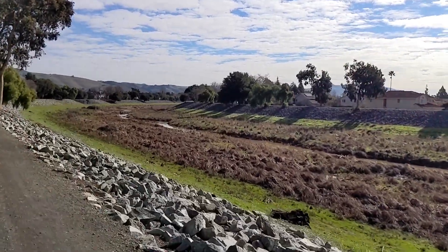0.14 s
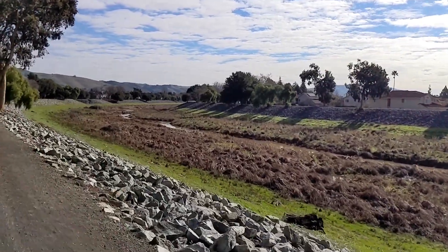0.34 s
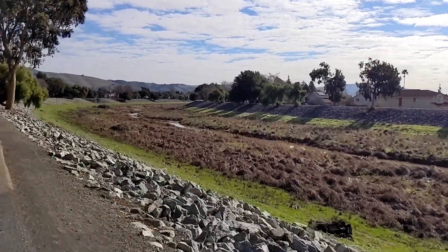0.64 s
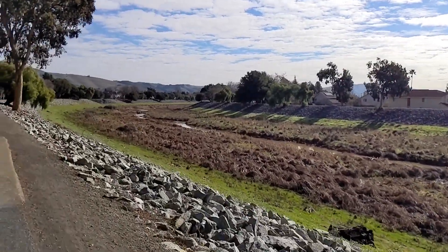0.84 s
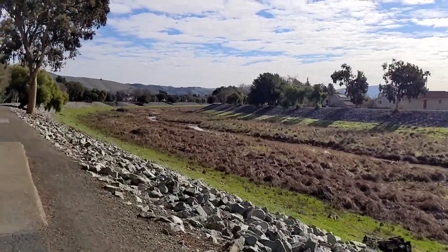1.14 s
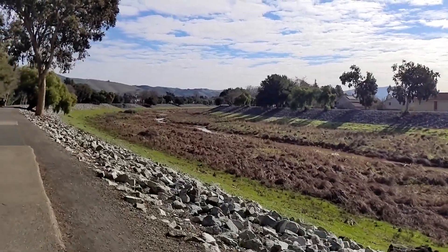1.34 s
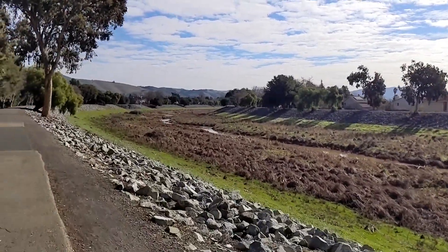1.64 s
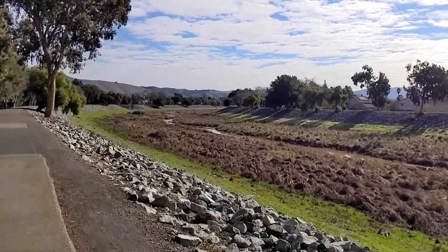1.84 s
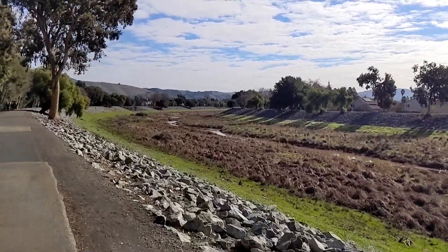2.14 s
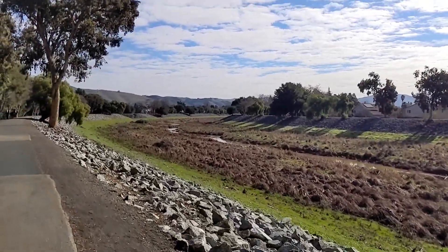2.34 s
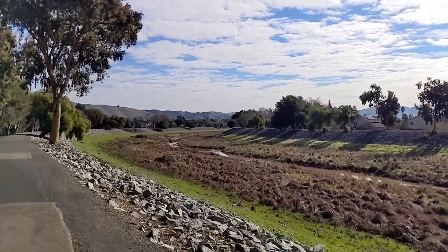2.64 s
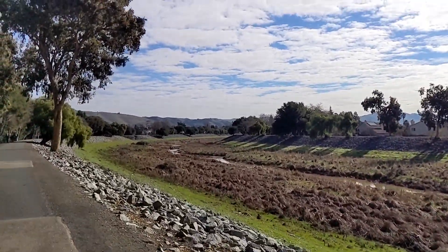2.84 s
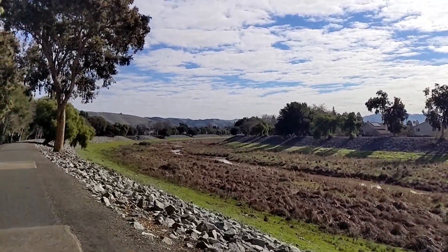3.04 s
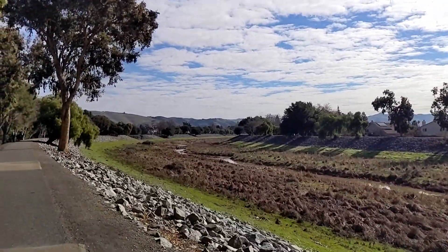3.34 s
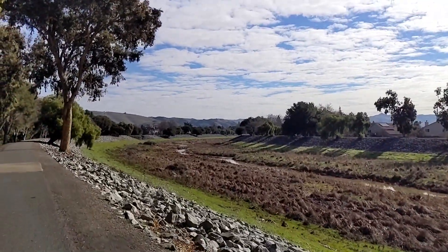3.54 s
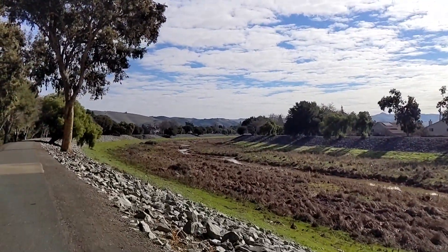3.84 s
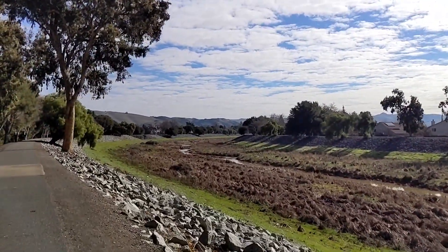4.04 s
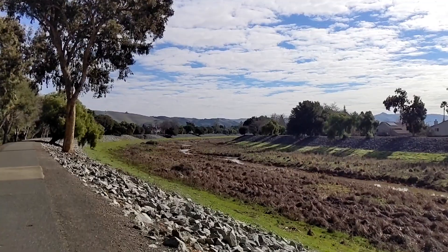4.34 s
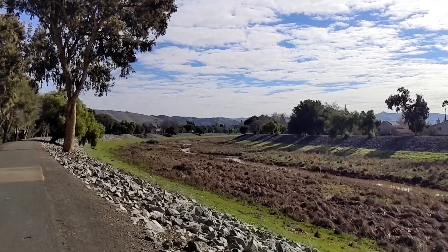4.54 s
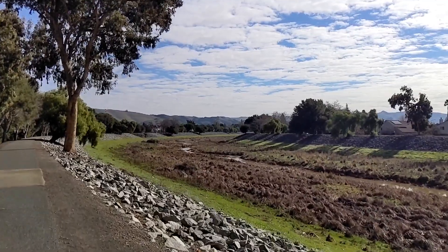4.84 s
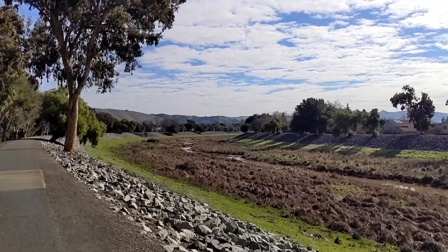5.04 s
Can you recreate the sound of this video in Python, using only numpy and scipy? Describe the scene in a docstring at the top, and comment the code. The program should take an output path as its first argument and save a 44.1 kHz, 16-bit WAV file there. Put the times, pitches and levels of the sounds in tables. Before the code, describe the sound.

A bicycle coasts on a paved path, tyres hissing, freewheel ticking in runs, loose parts rattling over bumps while wind gusts buffet one side.

```python
"""On a paved path a bicycle coasts along, heard by a hand-held camera with two microphone ports.
The head wind, shaped noise, blows into the left port and barely touches the sheltered right one. Tyres hiss
as flickering noise, and grit snaps as tiny dying tones. The freewheel and chain tick in short noise bursts
that ring the ratchet body. Loose parts knock and jingle over bumps, and two faint high tones sound, all as
fading sine waves. Table levels are relative: the functions add trims and random changes to many of them."""
import sys
import numpy as np
from scipy import signal
from scipy.fft import rfft, irfft, next_fast_len
from scipy.io import wavfile
from scipy.ndimage import uniform_filter1d, map_coordinates

SR = 44100
rng = np.random.default_rng(int(sys.argv[2]) if len(sys.argv) > 2 else 0)


def waveform_to_disk(signal):
    """Save audio, clipped to [-1, 1], as 16-bit WAV at the path in sys.argv[1]."""
    frames = np.transpose(np.atleast_2d(signal))
    scaled = np.clip(frames, -1, 1) * 32767
    samples = np.round(scaled).astype(np.int16)
    wavfile.write(sys.argv[1], SR, samples)


N = 229231  # length [samples]


def amp(db):
    """Turns decibels into a gain."""
    return 10 ** (np.asarray(db) / 20)


def unit(x):
    """Scales a sound to an rms (average strength) of 1."""
    return x / np.sqrt(np.mean(x ** 2) + 1e-20)


def curves(rows):
    """Joins table points by straight lines: one curve for each column after the time."""
    times, *columns = np.transpose(rows)
    return [np.interp(np.arange(N) / SR, times, column) for column in columns]


def wobble(rate):
    """Draws a smooth random curve through `rate` random points a second."""
    points = rng.standard_normal(int(N * rate / SR) + 4)
    return map_coordinates(points, [np.arange(N) * rate / SR])


def filtered(x, response):
    """Multiplies the spectrum of x by a response that depends on frequency."""
    size = next_fast_len(N + SR // 4)  # spare room so that the end does not wrap to the start
    return irfft(rfft(x, size) * response(np.fft.rfftfreq(size, 1 / SR)), size)[..., :N]


def spectrum_gain(hz, spectrum):
    """Reads a gain off the spectrum points on a log axis; next to nothing below the first point."""
    point_hz, point_db = np.transpose(spectrum)
    return amp(np.interp(np.log(hz + 1), np.log(point_hz), point_db, left=-120))


def coloured(x, spectrum):
    """Shapes x by a table of spectrum points."""
    return filtered(x, lambda hz: spectrum_gain(hz, spectrum))


def patchy(depth_db):
    """Makes white noise with random louder and softer patches in time and frequency."""
    z = signal.stft(rng.standard_normal(N), nperseg=256)[2]
    field = uniform_filter1d(rng.standard_normal(z.shape), size=5, axis=0)  # smooth over frequency
    field = uniform_filter1d(field, size=8, axis=1)  # smooth over time
    return signal.istft(z * amp(depth_db * unit(field)), nperseg=256)[1][:N]


# main colour of the wind roar: (frequency [Hz], level [dB])
ROAR = [(150, -12), (300, -8), (420, -0.5), (540, 0.5), (660, -3), (800, -17.5), (1100, -19), (2000, -81)]
# centre of the whistling part, which wanders with the angle of the wind: (time [s], frequency [Hz])
WHISTLE = [(0, 500), (.3, 455), (1.6, 470), (2.4, 480), (2.65, 575), (2.92, 457), (3.15, 514), (3.35, 430),
           (3.52, 510), (3.85, 490), (4.1, 428), (4.5, 414), (4.75, 454), (4.9, 517), (5.05, 410),
           (5.2, 480)]
WHISTLE_HZ = 490  # the centre at which ROAR is written


def whistling(x):
    """Shapes x by the roar's spectrum, slid up and down in pitch with the whistle."""
    hz, t, z = signal.stft(x, SR, nperseg=1024)
    slide = np.interp(t, *np.transpose(WHISTLE)) / WHISTLE_HZ
    gain = spectrum_gain(hz[:, None] / slide, ROAR)
    return signal.istft(z * gain, SR, nperseg=1024)[1][:N]


# wind roar on the left port: (time [s], level [dB])
GUSTS = [(0.02, -40), (0.37, -42.5), (0.42, -40.5), (0.5, -42.5), (0.71, -39.5), (0.79, -41.5), (0.86, -38),
         (1.3, -37), (1.43, -44), (1.55, -31.5), (1.595, -33.5), (1.65, -32.5), (1.74, -41), (1.85, -38),
         (2.41, -44.5), (2.445, -37), (2.54, -33.5), (2.57, -32), (2.7, -26), (2.83, -27), (2.94, -24),
         (3.005, -23.5), (3.03, -30.5), (3.08, -30), (3.15, -26.5), (3.2, -20.5), (3.24, -27.5),
         (3.33, -26.5), (3.39, -32.5), (3.47, -33.5), (3.59, -28), (3.72, -34), (3.83, -29.5), (4.35, -35),
         (4.47, -27.5), (4.65, -32.5), (4.7, -24), (4.77, -26), (4.84, -35), (4.93, -26.5), (4.97, -33),
         (5.1, -34.5), (5.2, -30)]
# slow drift of the wind's colour:
# (time [s], sharp edge over the roar [dB], deep part over the whistling part [dB])
TINT = [(0, -14, -2.5), (.9, -17.5, 1), (1.6, -16, -8), (1.9, -17, -1.5), (2.3, -14.5, -0.5),
        (2.7, -7.5, -5.5), (2.9, -9.5, -5), (3.3, -15.5, -4), (3.8, -11.5, -3.5), (4.2, -21, -2.5),
        (4.72, -14, 0.5), (4.85, -20.5, 1), (5.2, -23, 1.5)]
# slow thudding on the left port: (time [s], level [dB])
THUDS = [(0.0, -48.5), (0.36, -47), (0.42, -41), (0.45, -46.5), (0.8, -58), (0.82, -45.5), (1.09, -53),
         (1.11, -44.5), (1.32, -51.5), (2.14, -57), (2.17, -44), (2.29, -53), (3.05, -48), (4.39, -59),
         (5.07, -50.5), (5.17, -53), (5.2, -46)]
# steady wind on the right port: (time [s], level [dB])
LEE = [(0, -54.5), (1.3, -55), (2.4, -53.5), (3.0, -49), (3.7, -52.5), (4.5, -48.5), (5.2, -46)]
# single puffs that reach the right port: (time [s], level [dB])
PUFFS = [(.455, -48), (1.07, -53), (2.62, -50), (3.29, -51), (3.97, -54), (4.24, -52), (4.74, -49),
         (5.02, -53)]
# colours of the deep part, sharp edge, thudding and right-port wind: (frequency [Hz], level [dB])
DEEP = [(40, -53), (90, -14), (160, -2), (260, -1.5), (360, -2), (500, -5.5), (800, -55)]
EDGE = [(400, -9), (750, 6.5), (1000, 0.5), (1500, -5), (2500, -19), (4000, -30.5), (7000, -92)]
THUD = [(20, -30), (35, -12), (55, 1.5), (80, 3), (130, -1), (250, -39.5)]
PUFF = [(20, -27), (50, -7), (150, -1.5), (230, -6), (290, -8), (360, -2.5), (500, -4.5), (800, -12.5),
        (1500, -26.5)]
SURGE_S = 0.27  # a surge is the roar over its mean across this time
WHISTLE_GROWS = 0.48  # dB that edge and whistle gain for each dB of a surge
PUFF_S = 0.023  # half width of a puff


def wind():
    """Eddies beat on each port separately; surges whistle more, and lumps shake roar and edge together."""
    roar_db, = curves(GUSTS)
    edge_db, deep_db = curves(TINT)
    surge_db = roar_db - uniform_filter1d(roar_db, round(SURGE_S * SR))
    edge_db = edge_db + WHISTLE_GROWS * surge_db + 1.0 * wobble(9.7)
    deep_db = deep_db - WHISTLE_GROWS * surge_db + 1.1 * wobble(10)

    lumps_db = 0.87 * wobble(65) + 0.85 * wobble(120)
    roar = unit(amp(lumps_db) * whistling(patchy(0.97)))
    deep = unit(amp(0.45 * lumps_db + 1.5 * wobble(25)) * coloured(patchy(0.66), DEEP))
    edge = unit(amp(1.78 * lumps_db + 1.8 * wobble(70)) * coloured(patchy(0.98), EDGE))
    thud = unit(amp(2.4 * wobble(12)) * coloured(patchy(0.41), THUD))

    # dividing keeps the power nearly even as the balance moves
    body = (roar + amp(deep_db + 1.24) * deep) / np.sqrt(1 + amp(2 * deep_db))
    left = amp(roar_db + 5.5 + 1.1 * wobble(11)) * (body + amp(edge_db + 3.5) * edge)
    left = left + amp(curves(THUDS)[0] + 6.5) * thud

    t = np.arange(N) / SR
    puffs = sum(amp(db) * np.exp(-((t - s) / PUFF_S) ** 2) for s, db in PUFFS)
    lee = amp(curves(LEE)[0]) + puffs
    right = lee * unit(amp(3.1 * wobble(40)) * coloured(patchy(1.6), PUFF))
    return np.array([left + buffets(), right])


# rolling hiss: (time [s], level [dB], treble over that level [dB])
ROLL = [(0, -48.5, -3), (.3, -56.5, 0.5), (.72, -47.5, -1.5), (1.05, -55, 2), (1.35, -54, 1),
        (1.7, -53.5, 1.5), (1.95, -49, 1), (2.3, -55, 2), (2.6, -48.5, -1.5), (2.9, -56.5, 3),
        (3.6, -56, 1), (4.1, -52.5, 1.5), (4.65, -50, -1.5), (4.9, -56, 4.5), (5.2, -54.5, 2.5)]
# colour of the hiss at each port: (frequency [Hz], level [dB])
HISS_LEFT = [(700, 3), (1200, -4.5), (1700, -4), (2300, 6.5), (3200, 3), (4200, -0.5), (5500, -11),
             (7000, -6.5), (8500, -5), (10800, -13), (12500, -11.5), (15500, -9.5)]
HISS_RIGHT = [(700, -1.5), (1200, 2), (1700, 0), (2300, 2), (3200, 0.5), (4200, -4), (5500, -8.5),
              (7000, -3.5), (8500, -9), (10800, -15), (12500, -6.5), (15500, -2)]
SPLIT_HZ = 5200  # the treble starts about here


def tyres():
    """Rubber on rough asphalt: a hiss whose grain flutters at both ports at once."""
    low_db, treble_db = curves(ROLL)
    grain = amp(1.77 * wobble(40) + 1.3 * wobble(400))
    left = coloured(grain * patchy(1.36), HISS_LEFT)
    right = amp(-5.5) * coloured(grain * patchy(4.0), HISS_RIGHT)
    hiss = np.array([left, right])
    treble = filtered(hiss, lambda hz: 1 / (1 + (SPLIT_HZ / (hz + 1)) ** 6))
    low = hiss - treble
    return amp(low_db + 3.0) * unit(low) + amp(low_db + treble_db + 2.5) * unit(treble)


def grit():
    """Tiny stones snap under the tyres: one- or two-cycle snaps of scattered pitch and size."""
    when, pitch, size, side = rng.random((400, 4)).T[:, :, None]
    t = np.arange(64) / SR
    hz = 2500 * amp(13 * pitch ** 2)
    level_db = -52.0 - 4.8 * np.log(size + 0.023)  # a few loud snaps, many faint ones
    snaps = amp(level_db) * np.sin(2 * np.pi * hz * t) * np.exp(-t * hz / 1.5)
    at = ((when * (N - 64)).astype(int) + np.arange(64)).ravel()
    port_gains = amp(3.9 * side), amp(-8 * side)
    return np.array([np.bincount(at, (snaps * gain).ravel(), N) for gain in port_gains])


def ringing(hits, modes, rise_s, spread_db, wander):
    """Every hit sounds all the modes (single tones), each with a random strength, phase and pitch shift."""
    out, t = np.zeros(N + SR), np.arange(SR // 9) / SR
    for s, db in hits:
        ring = np.zeros(len(t))
        for hz, level_db, t60 in modes:  # t60: the time to fade by 60 dB
            strength, phase, shift = rng.random(3)
            fade = amp(level_db - spread_db * (strength - .5) - 60 * t / t60)
            shifted_hz = hz * (1 + wander * (shift - .5))
            ring += fade * np.sin(2 * np.pi * (shifted_hz * t + phase))
        out[round(s * SR):][:len(t)] += amp(db) * ring * (1 - np.exp(-t / rise_s))
    return out[:N]


# bumps that set the steel part jingling: (time [s], level [dB])
JINGLES = [(.105, -48.5), (.407, -40), (.423, -39), (0.4436, -34), (.464, -43), (1.833, -36), (1.85, -46),
           (1.9149, -40), (2.061, -42), (2.0856, -44), (2.97, -47), (4.612, -44)]
# tones of the steel part: (frequency [Hz], level [dB], time to fade by 60 dB [s])
STEEL = [(8105, 0, .07), (8155, -1, .07), (7080, -10, .04), (10340, -10, .05), (11300, -9, .04),
         (15420, -12, .04), (3120, -3, .04)]
TICK_JINGLE_DB = -40  # how hard a tick shakes the steel part, against the tick's level


def jingle():
    """A steel part rings: every tick shakes it a little, the bumps shake it hard."""
    hits = JINGLES + [(s, db + TICK_JINGLE_DB) for s, db, _ in TICKS]
    return amp([[5], [-9]]) * ringing(hits, STEEL, rise_s=.006, spread_db=6, wander=.004)


SMALL_KNOCK_DB, SMALL_KNOCK_HZ = -39, 2230  # loudest level and lowest pitch, before the knock's own shaping


def small_knocks(count):
    """Draws faint knocks at random moments, up to 4 dB softer and up to a half higher in pitch."""
    return [(when * N / SR, SMALL_KNOCK_DB - 4 * softer, SMALL_KNOCK_HZ * (1 + higher / 2), .0005)
            for when, softer, higher in rng.random((count, 3))]


# knocks of loose parts: (time [s], level [dB], pitch [Hz], rise time [s])
KNOCKS = [(0.1144, -37.5, 2560, .0006), (0.3917, -29, 2930, .0003), (0.4012, -29, 2290, .0003),
          (0.4083, -29, 3150, .0012), (0.4235, -30, 2300, .0005), (0.4155, -37, 2280, .001),
          (0.455, -37, 2460, .001), (0.644, -34.5, 2780, .0015), (0.655, -27.5, 2880, .0003),
          (0.673, -41, 2320, .0015), (0.712, -18.5, 2910, 0.00013), (0.792, -32, 2450, .0005),
          (1.067, -33, 3210, .0005), (1.086, -35.5, 2620, 0.00055), (1.2108, -35, 3670, .001),
          (1.292, -33, 2630, 0.00019), (1.7953, -24.5, 2920, 0.00034), (1.845, -31.5, 2740, .0005),
          (1.848, -35, 2920, 0.00046), (1.907, -28.5, 2900, 0.00027), (1.959, -35, 3400, .0005),
          (2.2204, -39, 2610, .0005), (2.3312, -37.5, 2620, .0005), (2.466, -36, 3140, 0.00055),
          (2.616, -34, 2970, .0008), (4.217, -38, 2860, .001), (4.236, -37, 2570, .0008),
          (4.244, -38, 3000, .0008), (4.27, -39, 3700, .0015), (4.3445, -48, 3900, .0015),
          (4.5015, -40, 2350, .001), (4.516, -32, 1880, 0.00026), (4.66, -36, 3300, .0005),
          (4.994, -30, 2660, 0.00046), (5.035, -39, 2680, 0.00046), (5.1831, -40, 2560, 0.00071)]
KNOCK_FADE_S = 0.0014  # the ping falls to about a third in this time


def knocks():
    """Loose parts snap: a few uneven cycles of a broad ping that die at once, then a rough tail."""
    out, t = np.zeros((2, N + SR)), np.arange(SR // 12) / SR
    band = signal.butter(2, [1700, 3800], "bandpass", fs=SR)
    tail = 0.29 * amp(-60 * t / 0.18) * (1 - np.exp(-t / 0.0018))
    for s, db, hz, rise_s in KNOCKS + small_knocks(count=14):
        snap = (1 - np.exp(-t / max(rise_s, 1 / SR))) ** 2 * np.exp(-t / KNOCK_FADE_S)
        drift = np.cumsum(rng.standard_normal((4, len(t))), axis=1) * .04  # makes the cycles uneven
        tones = np.sin(2 * np.pi * np.outer([0.999, 1.33, 0.784, 1.9], hz * t) + drift)
        ping = amp([0.5, -3.5, -8, -10.5]) @ tones
        rough = signal.lfilter(*band, rng.standard_normal((2, len(t))))
        both = (ping + 0.43 * rough) * snap / snap.max() + rough * tail
        both *= amp(db + np.array([[3], [-4.5]]))
        out[0, round(s * SR):][:len(t)] += both[0]
        out[1, round(s * SR) + 4:][:len(t)] += both[1]  # 4 samples later at the right port
    return out[:, :N]


# two faint high tones near 5.1 kHz, source unknown: (time [s], level [dB])
FAINT_TONES = [(.14, -49), (.58, -48)]
# their pitch: (frequency [Hz], level [dB], time to fade by 60 dB [s])
FAINT_TONE = [(5130, 0, .15)]


def faint_tones():
    """Two faint high tones of steady pitch: one sine each, equal at both ports."""
    return ringing(FAINT_TONES, FAINT_TONE, rise_s=.03, spread_db=2, wander=.02)


# freewheel and chain ticks, in runs about 14 a second and in bunches at the bumps:
# (time [s], level [dB], dull part and ring of the ratchet body against the tick [dB])
TICKS = [(0.3909, -32, -3), (0.4009, -15, -17), (0.409, -22, -4), (0.4215, -26, -6), (0.432, -32, -2),
         (0.442, -27, -4), (0.4515, -27, -2), (0.509, -34, -1), (0.681, -21, 0), (0.756, -35, 2),
         (0.8314, -22, -4), (0.913, -28, -9), (0.9836, -27.5, -0.5), (1.056, -34, 4), (1.21, -28, 0.5),
         (1.7958, -25.5, -4), (1.838, -19, -8), (1.8517, -27, 2.5), (1.882, -29, -4), (1.915, -24, -10),
         (2.061, -31.5, 2.5), (2.0856, -31, -4), (2.324, -34.5, 6), (2.394, -31.5, 4.5), (2.465, -27, -1),
         (2.539, -33, 5), (2.6149, -23.5, 2), (2.6937, -33, -4), (2.772, -33.5, 5), (2.988, -30.5, 3.5),
         (3.2008, -32, 0), (3.287, -35, 2), (4.093, -32, 5), (4.164, -31, -1), (4.236, -28.5, 7.5),
         (4.308, -23, -0.5), (4.38, -22.5, 4.5), (4.4526, -24, -5), (4.525, -26, -1), (4.58, -33, 7),
         (4.5993, -32.5, 3), (4.778, -30, 3), (4.9974, -32.5, 4)]
# colour of the ticks at each port: (frequency [Hz], level [dB])
TICK_LEFT = [(800, -4.5), (2000, -2.5), (4000, -3), (6000, -16), (8000, -3.5), (11000, -10.5), (15000, -13)]
TICK_RIGHT = [(800, -17), (1300, -3), (2000, -14), (4000, -20), (6000, -14), (8000, -11.5), (11000, -18),
              (15000, -8)]
DULL_HZ = 4800  # the dull part lies below this


def ticks():
    """A tick is a short burst that scatters off the ground; chain ticks are thin, ratchet ticks duller."""
    burst, t = np.zeros((2, N + SR)), np.arange(SR // 6) / SR
    swell = (t / .0024) ** 2 * np.exp(2 - 2 * t / .0024)  # peaks after 2.4 ms
    scatter = amp(-60 * t / 0.23) * (1 - np.exp(-t / 0.0056))
    shape = 0.45 * swell + 0.08 * scatter
    # deep patches give every tick its own colour
    source = np.pad([patchy(3.1), patchy(2.3)], [(0, 0), (0, SR)])
    dull = signal.filtfilt(*signal.butter(3, DULL_HZ, fs=SR), source)
    for s, db, dull_db in TICKS:
        start = round((s - .0004) * SR)  # a little early, as the burst needs time to swell
        span = slice(start, start + len(t))
        burst[:, span] += amp(db) * shape * (source[:, span] + (amp(dull_db) - 1) * dull[:, span])
    left = coloured(burst[0, :N], TICK_LEFT)
    right = coloured(burst[1, :N], TICK_RIGHT)
    return amp(6.5) * np.array([left, right])


# tones of the ratchet body: (frequency [Hz], level [dB], time to fade by 60 dB [s])
PAWL = [(3084, -1, 0.04), (3844, 3, 0.025), (6850, 4, 0.018), (9670, 0, 0.023), (14800, -10, .05)]
# ticks after which the lowest of these tones sings out: (time [s], level [dB])
SINGS = [(4.383, -26), (4.456, -34), (4.525, -36)]
PAWL_DB = -12  # trim of the ring against the tick


def pawl():
    """The ratchet body rings briefly after each tick, and sings out after a few."""
    hits = [(s, db + dull_db) for s, db, dull_db in TICKS]
    ring = amp(PAWL_DB) * ringing(hits, PAWL, rise_s=.004, spread_db=6, wander=.025)
    song = ringing(SINGS, PAWL[:1], rise_s=.006, spread_db=2, wander=.01)
    return amp([[3], [-5]]) * (ring + song)


# sudden buffets inside the gusts: (time [s], level [dB], pitch [Hz])
BUFFETS = [(1.564, -22.5, 480), (1.632, -14.5, 456), (2.695, -6, 587), (2.937, -5, 461), (2.987, -15, 580),
           (3.09, -24, 620), (3.114, -10.5, 525), (3.194, -5.5, 510), (3.203, -9.5, 560), (3.507, -10, 532),
           (4.72, -22, 413), (5.164, -15, 410)]


def buffets():
    """A single strong eddy rings the hollow of the left port for a few uneven cycles."""
    out, t = np.zeros(N + SR), np.arange(SR // 12) / SR
    swell = (1 - np.exp(-t / 0.0017)) * amp(-60 * t / 0.043)
    for s, db, hz in BUFFETS:
        drift = np.cumsum(rng.standard_normal(len(t))) * 0.011
        out[round(s * SR):][:len(t)] += amp(db + 2.5) * swell * np.sin(2 * np.pi * hz * t + drift)
    return out[:N]


def scene():
    """Adds up all sources at the two ports."""
    return wind() + tyres() + grit() + jingle() + knocks() + faint_tones() + ticks() + pawl()


TOP_HZ = 15900  # upper band limit


def record(dry):
    """The camera keeps nothing above its band limit."""
    return filtered(dry, lambda hz: hz < TOP_HZ)


dry = scene()
out = record(dry)
waveform_to_disk(out)
```